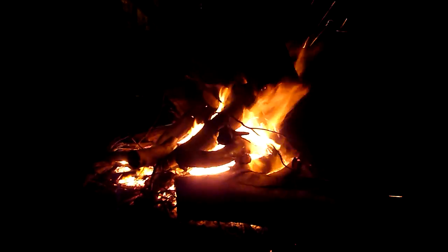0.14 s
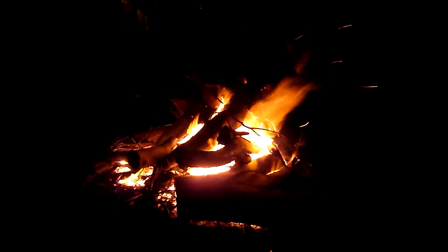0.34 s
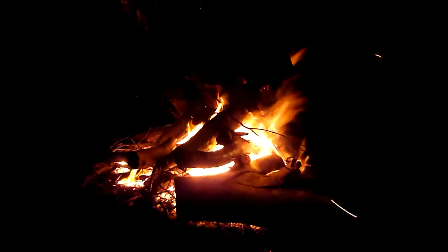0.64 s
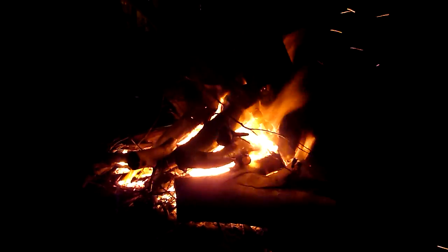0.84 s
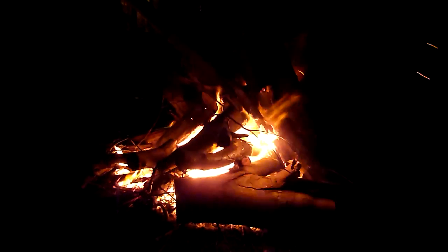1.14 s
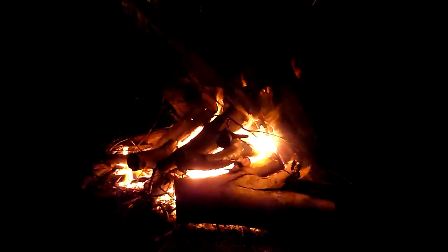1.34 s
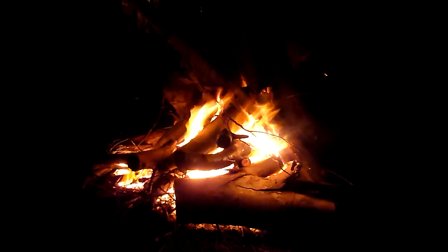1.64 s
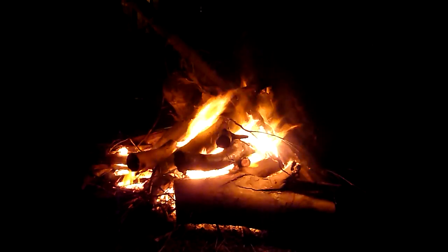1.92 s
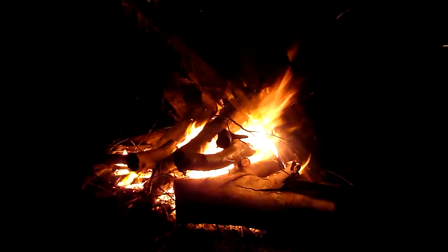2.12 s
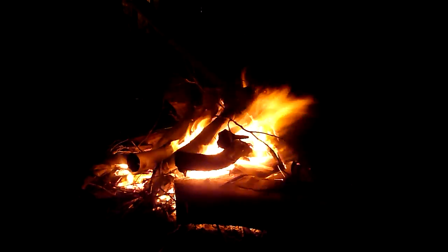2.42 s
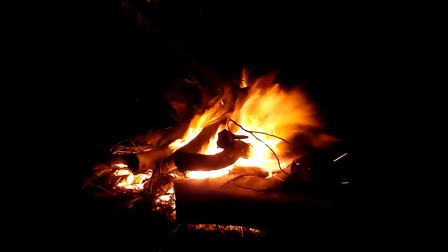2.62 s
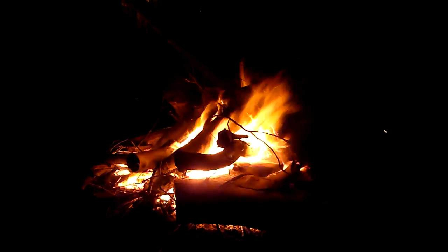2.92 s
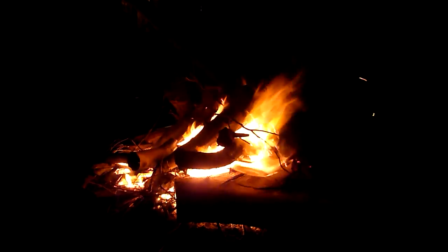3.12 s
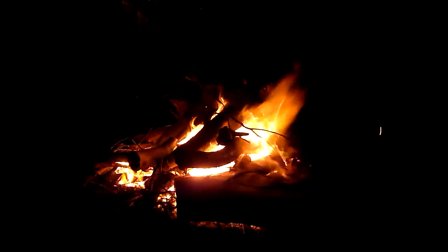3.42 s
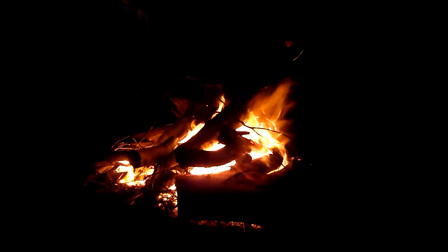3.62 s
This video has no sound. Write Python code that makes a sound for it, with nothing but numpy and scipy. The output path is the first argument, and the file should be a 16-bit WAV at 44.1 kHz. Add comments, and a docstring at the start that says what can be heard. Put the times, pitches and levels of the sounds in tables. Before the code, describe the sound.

Close stereo campfire in the open: constant airy hiss over soft low roar and tiny crackles, bright wood snaps near 1.2 and 2.4 seconds, and fluttering low wind bumps on the microphone, strongest around 1.3 seconds.

```python
"""Wind buffets thump each port of a close stereo microphone over the steady hiss of an outdoor log fire.
Hiss and roar are coloured noise; buffets are bell-shaped bursts of uneven swings over lumpy low wind noise.
Faint random ticks are short rings; wood pops are a snap, a click volley and a ringing splinter.
A jet of sap sizzles briefly as resonated noise; a limiter ducks both channels after strong peaks."""
import sys
import numpy as np
from scipy import signal
from scipy.fft import rfft, irfft
from scipy.io import wavfile
from scipy.ndimage import uniform_filter1d, minimum_filter1d

SR = 44100
rng = np.random.default_rng(int(sys.argv[2]) if len(sys.argv) > 2 else 0)


def store_wav(level_fs):
    """Save 16-bit WAV to argv[1]."""
    pcm = np.round(np.clip(np.atleast_2d(level_fs), -1, 1) * 32767)
    wavfile.write(sys.argv[1], SR, pcm.T.astype(np.int16))


def level_to_linear(level):
    """Convert decibel levels to linear amplitude factors, elementwise."""
    exponent = np.asarray(level, float) / 20
    return 10 ** exponent


N = 165816
MIC_TOP_HZ = 15900

# Base level of the hiss, rising at first as the recorder's gain recovers: time_s, level_db
HISS_LEVEL = [(0.0, -42.5), (0.49, -38), (3.76, -39.5)]
# Relative hiss spectrum heard alike left and right: freq_hz, density_db_per_hz
HISS_MID = [(250, -15), (420, -4), (453, -1), (747, -1), (883, -5), (1180, -0.5), (1370, -6.5), (1720, -3),
            (1880, -7.5), (2160, -3), (2510, -4), (3250, -1.5), (6240, -2.5), (7260, -0.5), (10900, 0),
            (14600, -4), (15700, -5.5)]
# Relative hiss spectrum heard opposite left and right: freq_hz, density_db_per_hz
HISS_SIDE = [(250, -33), (420, 3), (519, 1), (924, 1.5), (1140, 0), (1350, -1), (2000, -3.5), (6630, -10),
             (8580, -7.5), (15000, -12.5), (15700, -6.5)]
# Part of the opposite hiss trailing the common hiss by a quarter cycle: freq_hz, share_ratio
OUT_OF_STEP = [(300, 0), (520, .6), (1900, 0.56), (3000, 0.27)]
# Relative spectrum of the low flame noise: freq_hz, density_db_per_hz
ROAR_SPECTRUM = [(60, -11), (130, 2.5), (250, 2.5), (320, -2), (400, -19), (600, -36)]
# Strongest buffets, left-port list then right-port list, before stretch and trim:
# centre_s, length_s, level_db, pitch_hz
BUFFETS = [
    [(0.007, 0.0091, -12.5, 127), (0.025, 0.054, -34, 136.2), (0.048, 0.004, -13.5, 127),
     (0.065, 0.013, -18, 170), (0.104, 0.013, -14, 175), (0.144, 0.014, -29, 89), (0.185, 0.018, -19, 101),
     (0.22, 0.0065, -16.5, 150), (0.231, 0.0095, -16, 123), (0.253, 0.014, -24, 188),
     (0.345, 0.0087, -17.5, 113), (0.721, 0.027, -18.5, 124), (0.869, 0.017, -20.5, 128),
     (1.036, 0.04, -23, 99.6), (1.062, 0.015, -20.5, 119), (1.289, 0.013, -21, 130),
     (1.311, 0.025, -13, 191), (1.327, 0.011, -13.5, 280), (1.357, 0.01, -7, 162),
     (1.385, 0.011, -11.5, 151), (1.414, 0.012, -18, 147), (1.448, 0.0082, -22.5, 126),
     (1.606, 0.067, -33.5, 138), (1.637, 0.017, -25, 92.5), (1.889, 0.019, -33, 152),
     (1.922, 0.019, -18.5, 166), (2.426, 0.01, -20.5, 90), (3.097, 0.023, -18, 133),
     (3.53, 0.027, -21, 122), (3.562, 0.023, -34, 120), (3.607, 0.011, -34, 180),
     (3.679, 0.0063, -22.5, 230), (3.719, 0.0078, -22.5, 266), (3.733, 0.011, -10.5, 148)],
    [(0.012, 0.04, -14.5, 133), (0.046, 0.012, -10, 128), (0.102, 0.023, -22, 165),
     (0.13, 0.0081, -19, 120), (0.228, 0.0042, -12, 172), (0.341, 0.0075, -13, 136),
     (0.484, 0.017, -24.5, 114), (0.634, 0.025, -36, 107.5), (0.705, 0.013, -16.5, 146),
     (0.863, 0.015, -32.5, 118), (1.025, 0.015, -19, 110), (1.264, 0.017, -32, 90.5),
     (1.291, 0.009, -11.5, 130), (1.311, 0.012, -10, 153), (1.327, 0.0071, -4, 232),
     (1.345, 0.013, -9.5, 128), (1.361, 0.016, -11.5, 168), (1.385, 0.026, -18, 188),
     (1.408, 0.013, -11.5, 110), (1.44, 0.039, -33, 124), (1.479, 0.012, -29.5, 109),
     (1.585, 0.037, -23.5, 121.7), (1.657, 0.03, -23.5, 134), (1.887, 0.012, -31, 166),
     (1.905, 0.0081, -17, 143), (1.922, 0.014, -24.5, 91), (1.942, 0.011, -19, 87.0),
     (1.961, 0.071, -35.5, 82), (1.986, 0.014, -26.5, 77), (2.015, 0.014, -17, 110),
     (2.308, 0.015, -27.5, 96), (2.383, 0.046, -30.5, 89), (2.483, 0.013, -30, 140),
     (3.093, 0.014, -19.5, 123), (3.514, 0.013, -15.5, 129), (3.558, 0.025, -24.5, 141),
     (3.601, 0.025, -19, 145), (3.636, 0.015, -41, 114), (3.689, 0.014, -21.5, 143),
     (3.739, 0.032, -16, 158)],
]
# Wind noise under the buffets, before trim and lumps: time_s, level_db
BREEZE = [(0, -40), (.3, -42), (.55, -44), (.95, -45), (1.2, -46), (1.45, -40.5), (1.68, -36), (1.76, -61),
          (1.86, -46), (2.0, -48), (2.07, -49.5), (2.2, -47.5), (2.5, -39.5), (2.7, -50), (2.98, -49.5),
          (3.05, -41), (3.2, -46.5), (3.42, -49), (3.52, -41), (3.76, -38)]
# Relative wind spectrum: freq_hz, density_db_per_hz
BREEZE_SPECTRUM = [(12, -27), (20, -2), (81, 10.5), (189, 1), (309, -4.5), (386, -11), (700, -26),
                   (910, -56.5), (1540, -120)]
# Wood pops, crack level before bandwidth scaling and part trims, ring level before mode trims:
# start_s, crack_db, crack_centre_hz, lowest_ring_hz, ring_db
POPS = [(1.1190, -13, 7000, 1015, -35.5), (1.1984, -12.5, 3470, 1295, -23.5),
        (1.3405, -20, 7040, 2520, -29), (1.4495, -39, 2570, 1000, -34.5), (1.480, -33, 2400, 2370, -47),
        (1.588, -39, 1500, 1530, -39), (1.6322, -31, 2700, 2880, -28), (2.096, -35, 2000, 1220, -34.5),
        (2.4050, -16.5, 4440, 1750, -26.5), (2.647, -43, 1200, 1210, -43), (2.9572, -34.5, 820, 563, -34),
        (3.1178, -27, 3330, 1170, -42), (3.193, -43, 700, 1700, -33), (3.515, -24.5, 6500, 6500, -43),
        (3.527, -31, 4400, 1030, -37)]
# Splinter modes, as of a free bar: multiple_of_lowest_ring_ratio, trim_db
SPLINTER_MODES = [(1, 2), (2.8, -7), (5.2, 5.5)]


def in_time(rows):
    """Second column of a curve over time, joined by straight lines."""
    return np.interp(np.arange(N) / SR, *np.transpose(rows))


def rms_one(x):
    """Scale to rms 1."""
    return x / np.sqrt(np.mean(x ** 2) + 1e-20)


def drift(corner_hz):
    """Slow random curve of rms 1: two-pole filtered noise, one point per 40 samples, interpolated."""
    step, settle = 40, 2000
    pole = np.exp(-2 * np.pi * corner_hz * step / SR)
    noise = rng.standard_normal(N // step + 2 + settle)
    slow = signal.lfilter([1], [1, -2 * pole, pole * pole], noise)[settle:]
    return np.interp(np.arange(N) / step, np.arange(len(slow)), rms_one(slow))


def coloured(spectrum, patchy_db, patch_hz, count, white=None):
    """Noise of the given spectrum in overlapping bands that flicker independently; rms 1."""
    freq_hz, density_db = np.transpose(spectrum)
    log_hz = np.log(np.maximum(np.arange(N // 2 + 1) * SR / N, 1))
    if white is None:
        white = rfft(rng.standard_normal(N))
    noise = white * level_to_linear(np.interp(log_hz, np.log(freq_hz), density_db))
    centres = np.linspace(np.log(freq_hz[1]), np.log(freq_hz[-1]), count)
    total = np.zeros(N)
    for row in np.eye(count):
        share = np.interp(log_hz, centres, row)
        total += irfft(noise * share, N) * level_to_linear(patchy_db * drift(patch_hz))
    return rms_one(total)


def ring(clicks, freq_hz, t60_s):
    """Two-pole resonance: a unit click starts a decaying sine of height 1."""
    pole, turn = level_to_linear(-60 / (t60_s * SR)), 2 * np.pi * freq_hz / SR
    return signal.lfilter([0, np.sin(turn)], [1, -2 * pole * np.cos(turn), pole * pole], clicks + 1e-18)


def hiss():
    """Gas and steam escaping from the logs; the level flickers slightly."""
    mid_db, side_db = 0.56, -4.5   # over the base level
    common, own = rfft(rng.standard_normal((2, N)))
    link = np.clip(np.interp(np.arange(N // 2 + 1) * SR / N, *np.transpose(OUT_OF_STEP)), 0, 1)
    opposite = np.sqrt(1 - link ** 2) * own - 1j * link * common   # -1j: quarter-cycle lag
    mid = level_to_linear(mid_db) * coloured(HISS_MID, patchy_db=0.8, patch_hz=6.8, count=12, white=common)
    side = level_to_linear(side_db) * coloured(HISS_SIDE, patchy_db=1.5, patch_hz=10, count=6, white=opposite)
    flicker_db = 0.5 * drift(4.7) + 0.69 * drift(45)
    return level_to_linear(in_time(HISS_LEVEL) + flicker_db) * (mid + side * [[1], [-1]])


def roar():
    """Soft low noise of the flames, identical at both ports."""
    return level_to_linear(-46.5) * coloured(ROAR_SPECTRUM, patchy_db=0, patch_hz=5.5, count=3)


def buffets(rows):
    """Eddies rock the membrane under a bell; weaker ones have sharper edges, stronger are rounder, more spray."""
    stretch, wobble_rad, trim_db = 0.41, 0.88, 0.5
    edge_base, edge_per_db = 0.16, -0.25   # edge: overtone ratio
    spray_db, spray_per_db = -27, 0.9   # small eddies on a buffet, growing with its strength and speed
    out, t = np.zeros(N + 2 * SR), np.arange(-4000, 4000) / SR
    low_cut = signal.butter(2, 220, "high", fs=SR, output="sos")
    high_cut = signal.butter(3, 414, fs=SR, output="sos")
    spray = rms_one(signal.sosfilt(np.r_[low_cut, high_cut], rng.standard_normal(len(out))))
    for centre_s, length_s, level_db, pitch_hz in rows:
        start, bend, pace, skew = rng.random(4)
        bend_cycles = bend + pitch_hz * t * (0.33 + 0.28 * pace)
        phase = 2 * np.pi * (start + pitch_hz * t) + wobble_rad * np.sin(2 * np.pi * bend_cycles)
        edge = np.clip(edge_base + edge_per_db * (level_db + 24.5), 0, 0.6)
        swing = sum(edge ** k * np.sin((k + 1) * phase + 2 * np.pi * skew * k) for k in range(5))
        i = int(centre_s * SR) + SR - len(t) // 2
        strength_db = level_db + 15 + 20 * np.log10(pitch_hz / 150)
        swing = swing + level_to_linear(spray_db + spray_per_db * strength_db) * spray[i:i + len(t)]
        bell = np.exp(-0.5 * (t / (stretch * length_s)) ** 2)
        out[i:i + len(t)] += level_to_linear(level_db + trim_db) * swing * bell
    return out[SR:SR + N]


def wind():
    """Buffets over lumpy low noise, independent at each port."""
    trim_db, lumps_db, lumps_hz = 3, 2.5, 10.6
    ports = []
    for rows in BUFFETS:
        level_db = in_time(BREEZE) + trim_db + lumps_db * drift(lumps_hz)
        noise = coloured(BREEZE_SPECTRUM, patchy_db=4.0, patch_hz=15.5, count=4)
        ports.append(buffets(rows) + level_to_linear(level_db) * noise)
    return np.array(ports)


def ticks():
    """Faint random crackle: rings a few cycles long at twelve pitches over about four octaves."""
    ticks_per_s, floor_db, spread_db, t60_cycles = 41, -42, 2, 4.5
    size_db = floor_db + spread_db * np.minimum(rng.exponential(1, N), 3)
    clicks = level_to_linear(size_db) * rng.choice([-1, 1], N) * (rng.random(N) < ticks_per_s / SR)
    dealt = rng.integers(0, 12, N)
    pitches_hz = np.geomspace(600, 9000, 12)
    return sum(ring(clicks * (dealt == k), hz, t60_cycles / hz) for k, hz in enumerate(pitches_hz))


def pops():
    """A pocket bursts: a broad snap and dying click volley; the torn splinter rings, higher modes shorter."""
    snap_low_hz, snap_reach_ratio, snap_db = 150, 3.1, -3.5
    click_share, volley_db, volley_t60_s = 0.37, -2, 0.011
    band_ratio, first_click, side_db = 1.4, 3.2, -6
    ring_cycles = 21   # T60 of the lowest mode
    out, t = np.zeros((2, N + SR)), np.arange(2000) / SR
    click = 1. * (t == 0)
    for start_s, crack_db, centre_hz, ring_hz, ring_db in POPS:
        chance = rng.random((4, len(t)))
        signs, present = np.sign(chance[:2] - 0.5), chance[2:] < click_share
        volley = signs * present * level_to_linear(volley_db - 60 * t / volley_t60_s)
        volley[0, 0] = first_click
        top_hz = min(snap_reach_ratio * centre_hz, MIC_TOP_HZ)
        snap_band = signal.butter(2, [snap_low_hz, top_hz], "band", fs=SR, output="sos")
        snap = signal.sosfilt(snap_band, click)
        edges_hz = [centre_hz / band_ratio, centre_hz * band_ratio]
        mid, side = signal.sosfilt(signal.butter(2, edges_hz, "band", fs=SR, output="sos"), volley)
        crack = level_to_linear(snap_db) * snap + mid + level_to_linear(side_db) * side * [[1], [-1]]
        rings = np.zeros(len(t))
        for k, mode_db in SPLINTER_MODES:
            if ring_hz * k < top_hz:
                rings += level_to_linear(ring_db + mode_db) * ring(click, ring_hz * k, ring_cycles / ring_hz / np.sqrt(k))
        i = int(start_s * SR)
        out[:, i:i + len(t)] += crack * level_to_linear(crack_db) * SR / (2 * top_hz) + rings
    return out[:, :N]


def sap():
    """A jet of sap: spluttering noise in one narrow resonance, swelling and fading."""
    from_s, to_s = 1.32, 1.68
    swell = np.sin(np.pi * np.clip((np.arange(N) / SR - from_s) / (to_s - from_s), 0, 1))
    sizzle = rms_one(ring(rng.standard_normal(N), freq_hz=2220, t60_s=0.013))
    return level_to_linear(-48 + 0.98 * drift(33)) * swell * sizzle


def scene():
    """Sum of fire and wind; hiss 1 dB stronger on the left."""
    balance_db = np.array([[0.5], [-0.5]])
    return hiss() * level_to_linear(balance_db) + roar() + wind() + ticks() + pops() + sap()


def band_limit(x):
    """A steep low-pass at the top of the band."""
    return signal.sosfilt(signal.butter(12, 15880, fs=SR, output="sos"), x)


def record(dry):
    """Microphone trims both ends; limiter senses the louder channel, ducks both, holds and glides back."""
    threshold_db, duck_share = -17, 0.45
    sense_s, hold_s, glide_s = 0.0047, 0.072, 0.0033
    initial_duck_db = 2.5   # already held at the start
    dry = signal.sosfilt(signal.butter(2, 31.7, "high", fs=SR, output="sos"), dry)
    dry = signal.sosfilt(signal.ellip(12, 0.3, 60, MIC_TOP_HZ, fs=SR, output="sos"), dry)
    power = uniform_filter1d(dry ** 2, max(int(sense_s * SR), 1), axis=1).max(axis=0)
    duck_db = duck_share * np.maximum(10 * np.log10(power + 1e-12) - threshold_db, 0)
    hold = int(hold_s * SR) // 2 * 2 + 1
    padded_db = np.r_[np.full(hold, initial_duck_db), duck_db]
    first = hold // 2 + 1   # the window then looks only backwards
    held_db = -minimum_filter1d(-padded_db, hold)[first:first + N]
    pole = np.exp(-1 / (glide_s * SR))
    smooth_db = signal.lfilter([1 - pole], [1, -pole], held_db - held_db[0]) + held_db[0]
    return band_limit(dry * level_to_linear(-smooth_db))


dry = scene()
out = record(dry)
store_wav(out)
```